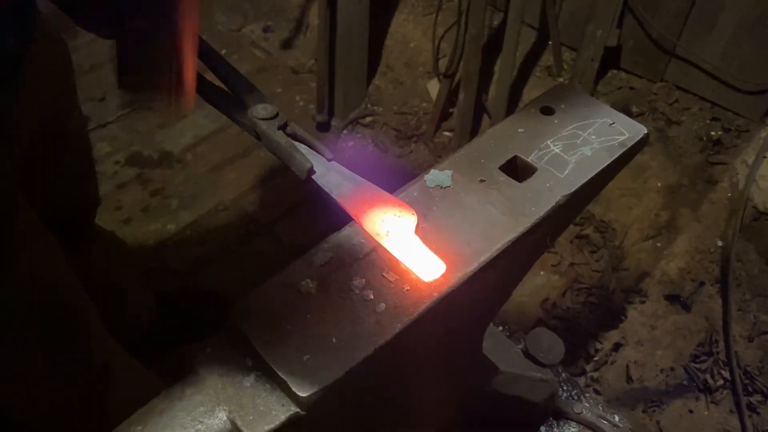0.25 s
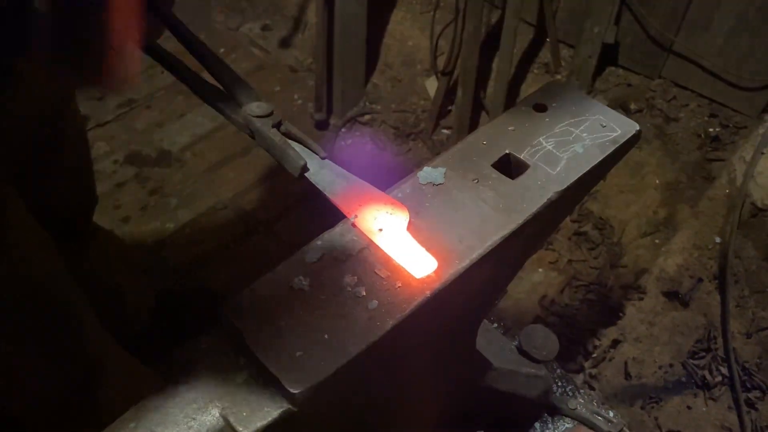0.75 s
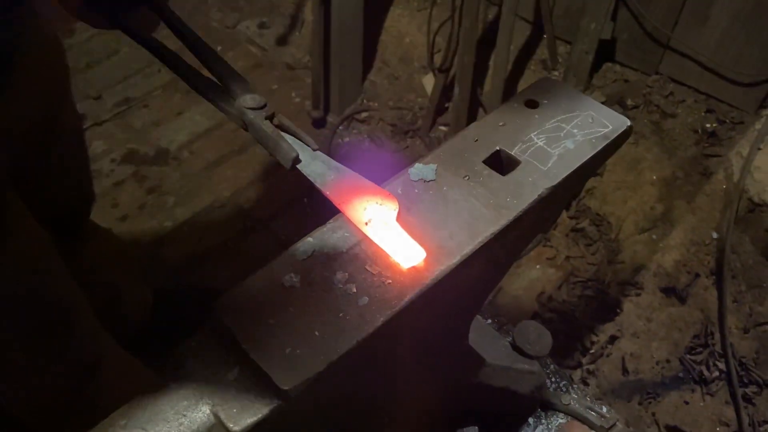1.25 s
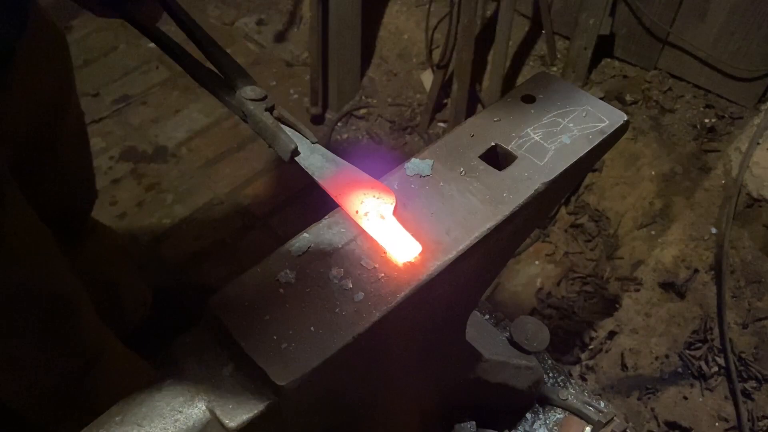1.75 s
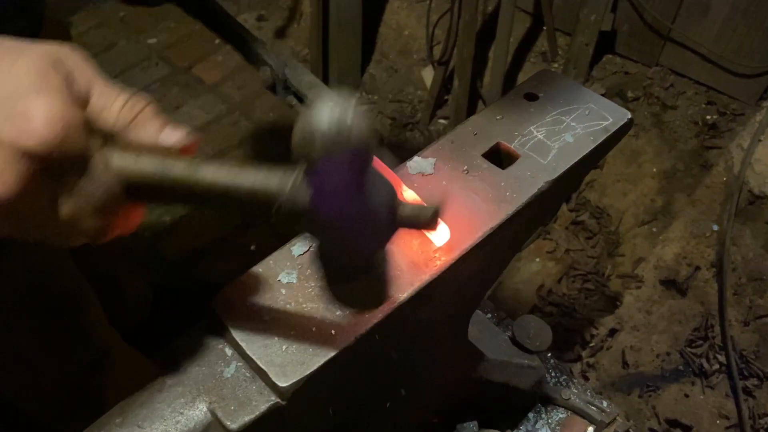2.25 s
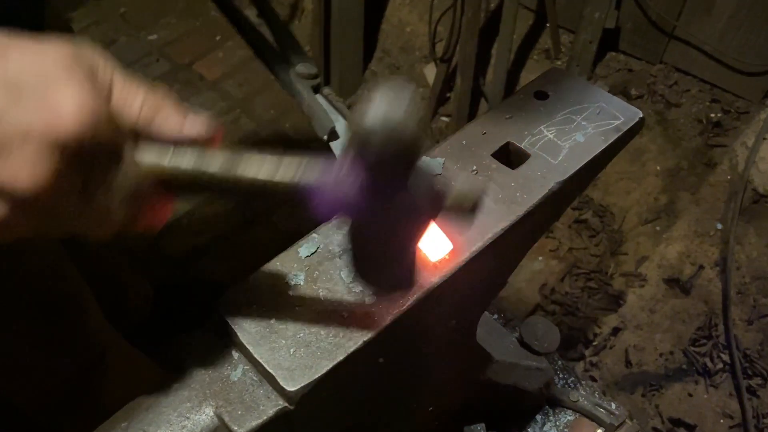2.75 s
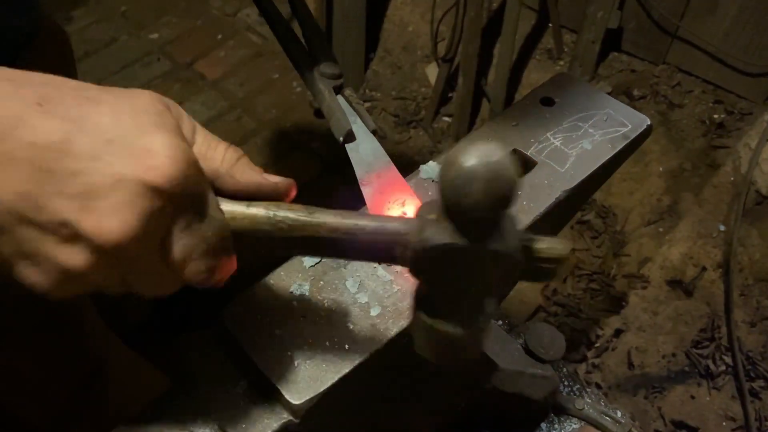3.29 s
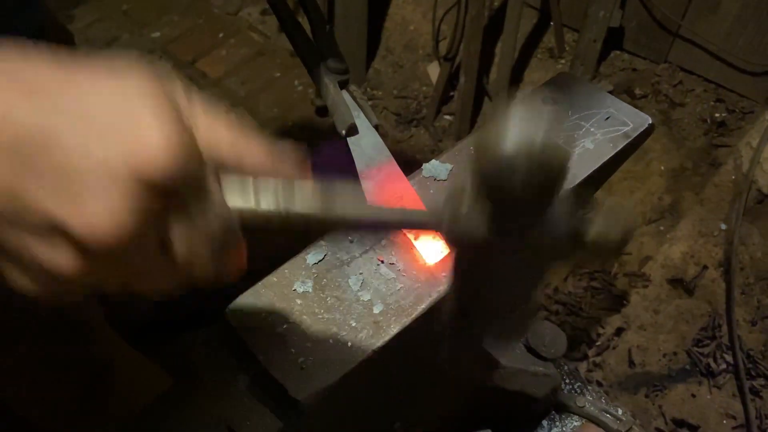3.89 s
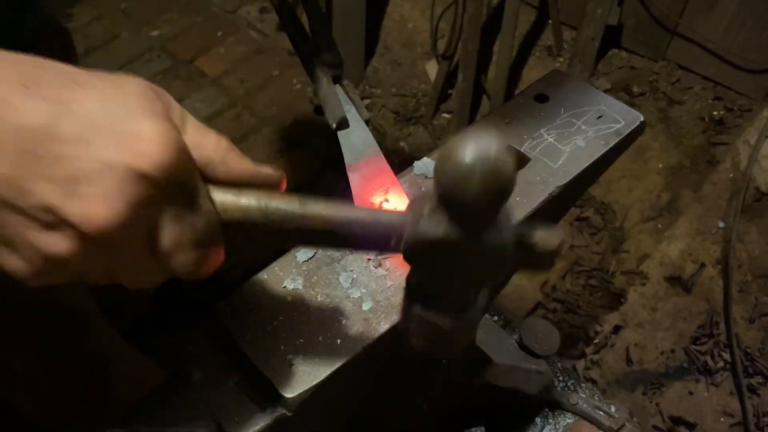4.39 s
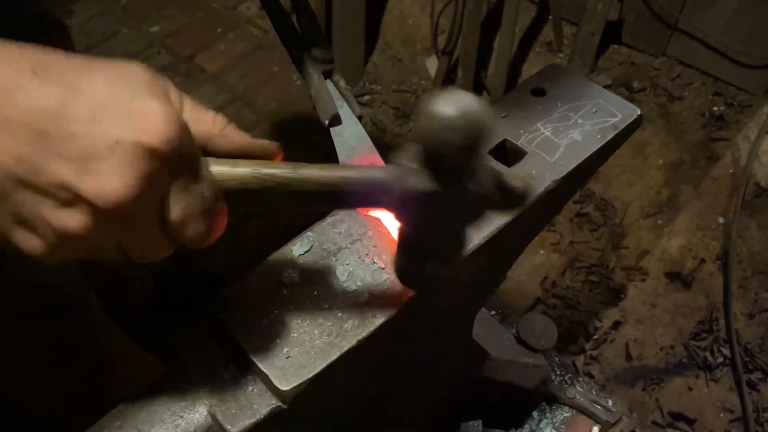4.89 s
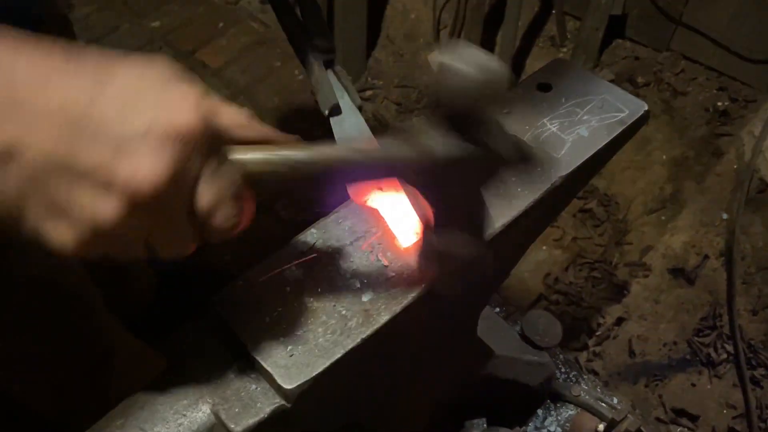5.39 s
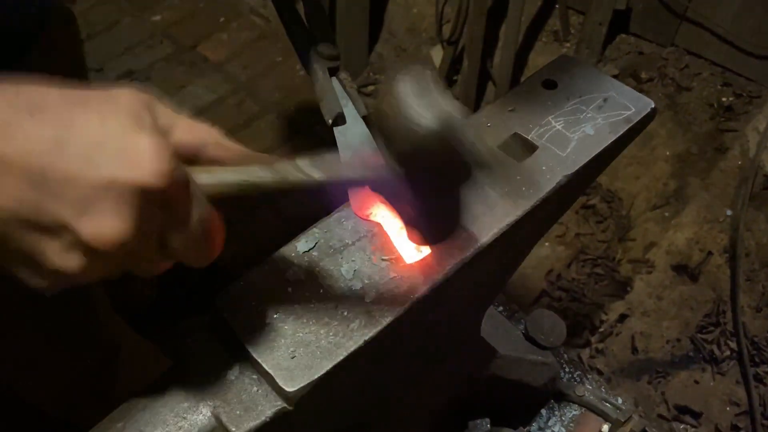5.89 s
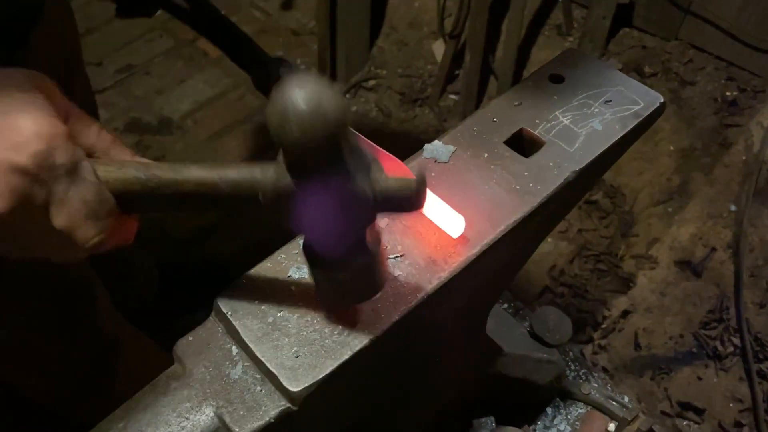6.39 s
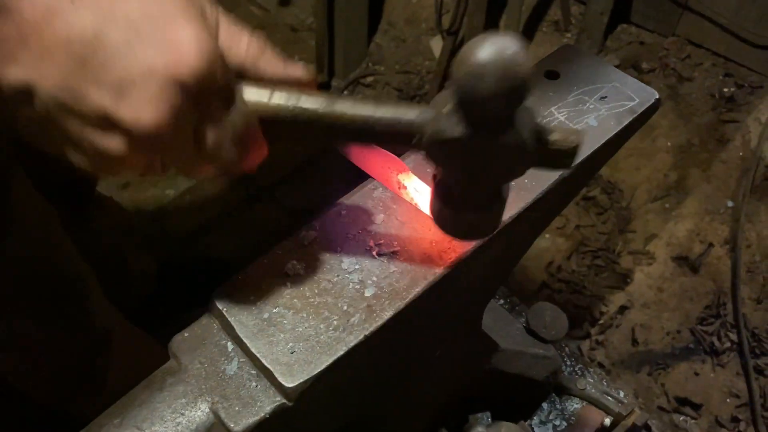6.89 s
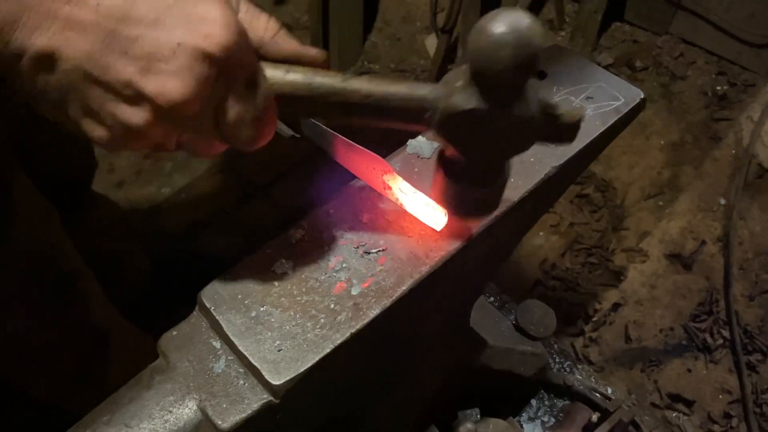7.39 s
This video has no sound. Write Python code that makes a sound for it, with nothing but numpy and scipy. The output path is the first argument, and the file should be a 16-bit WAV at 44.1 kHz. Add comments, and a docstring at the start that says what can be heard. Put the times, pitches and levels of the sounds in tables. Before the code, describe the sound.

Hard metallic hammer blows thud and clank about twice a second on an anvil outdoors, briefly echoing, while insects pulse quietly behind a low rumble.

```python
"""An open-air forge at night: a smith flattens a hot steel bar on an anvil. Heavy blows thud and ring briefly,
as contact pulses and decaying steel modes with echoes of forge and yard. Between them the hammer bounces
lightly on the bare face; bar and tongs rattle back onto the anvil as short bright noise bursts, and the sliding
bar is gritty band noise. Falling tones chirp, noise bands trill and throb as crickets, over a low rumble of
shaped noise with a thin hum."""
import sys
import numpy as np
from scipy import signal
from scipy.fft import rfft, irfft, next_fast_len
from scipy.io import wavfile
from scipy.ndimage import uniform_filter1d

SR = 44100
rng = np.random.default_rng(int(sys.argv[2]) if len(sys.argv) > 2 else 0)


def int16_out(signal):
    """Quantize to a 16-bit WAV file."""
    q = np.round(np.clip(np.atleast_2d(signal).T, -1, 1) * 32767)
    wavfile.write(sys.argv[1], SR, q.astype(np.int16))


N = 337365
TIME = np.arange(N) / SR
SPAN = 2 ** 16   # samples in which one blow dies away

# blows on the hot bar; a dead blow sinks into the steel instead of ringing the anvil: (time [s], force [dB],
# thump against force [dB], deadness [0-1], rattle of bar and tongs before its trim [dB])
HOT_BLOWS = [(-.25, 2, -24, .1, -60), (.278, 0, -17.5, .05, -34.5), (.807, -0.5, -16.5, 0.05, -54),
             (1.352, -0.5, -30, .05, -37.5), (1.884, .5, -33.5, .1, -62), (3.063, 0.5, -30, .7, -62),
             (3.596, -1.5, -27, .05, -36.5), (4.144, 0, -28, .3, -25), (4.688, .5, -35.5, .05, -26.5),
             (5.215, -0.5, -28.5, .05, -55), (5.749, -0.5, -31.5, .1, -50.5), (6.618, -12.5, -35, 1, -70),
             (7.183, 2, -31.5, 0.92, -60)]


def from_db(db):
    """Decibels to gain."""
    return 10 ** (np.asarray(db) / 20)


def rms_one(x):
    """Scale to unit rms."""
    return x / np.sqrt(np.mean(x ** 2) + 1e-30)


def at_hz(points, hz, axis=1):
    """Read one column of a table on a log-frequency axis."""
    points = np.array(points)
    return np.interp(np.log(np.maximum(hz, 1)), np.log(points[:, 0]), points[:, axis])


def at_time(curve, s):
    """Read a curve at time s."""
    return np.interp(s, *np.transpose(curve))


def bins(size):
    """Frequencies of a spectrum of so many samples."""
    return np.fft.rfftfreq(size, 1 / SR)


def add(out, s, sound):
    """Mix a sound in, starting at time s."""
    at = int(round(s * SR))
    first, last = max(at, 0), min(at + sound.shape[-1], N)
    if last > first:
        out[..., first:last] += sound[..., first - at:last - at]


def diffuse(size):
    """Spectrum of white stereo noise that arrives from all sides."""
    # left-right likeness of diffuse sound: (frequency [Hz], correlation [-1 to 1])
    likeness = [(100, .9), (300, .8), (650, .4), (1400, .1), (3000, .3), (6200, .3), (8500, .95),
                (15000, .95)]
    mid, side = rfft(rng.standard_normal((2, size)))
    alike = np.clip(at_hz(likeness, bins(size)), -1, 1)
    opposed = side * [[1], [-1]]
    return np.sqrt((1 + alike) / 2) * mid + np.sqrt((1 - alike) / 2) * opposed


def noise(gain_at):
    """Diffuse noise coloured by a gain that depends on frequency."""
    size = next_fast_len(N, True)
    return irfft(diffuse(size) * gain_at(bins(size)), size)[:, :N]


def band_noise(hz, width):
    """Diffuse noise through a steep resonance, rms 1."""
    return rms_one(noise(lambda f: 1 / (1 + ((f - hz) / width * 2) ** 2) ** 1.3))


def swell(middle, half):
    """A smooth rise and fall."""
    return np.exp(-((TIME - middle) / half) ** 2)


def causal(db):
    """Spectrum of the most compact causal pulse with these levels."""
    cepstrum = irfft(np.log(from_db(db)))
    # folding the cepstrum onto positive times gives minimum phase
    cepstrum[1:SPAN // 2] *= 2
    cepstrum[SPAN // 2 + 1:] = 0
    return np.exp(rfft(cepstrum))


def contacts():
    """Force and deadness shape each contact.

    Yields time [s], then knock, thump, ring, clack, crack, left over right, carry into the yard [dB].
    """
    # the hammer idles on the bare face while the bar is turned: (time [s], force [dB])
    taps = [(2.222, 0), (2.333, -2), (2.418, -7.5), (6.178, -1.3), (6.307, -2.5)]
    # parts of a lively blow at zero force, in dB
    knock_db, ring_db, clack_db, crack_db, carry_db, pan_db = -9.5, -13.5, -24, -23, 4.5, 1.7
    # what a wholly dead blow gains and loses, in dB
    dead_knock_gain, dead_ring_loss, dead_crack_loss, dead_carry_loss = 7, 11, 2, 7.5
    for s, force, thump, dead, _ in HOT_BLOWS:
        knock = force + knock_db + dead_knock_gain * dead
        ringing = force + ring_db - dead_ring_loss * dead ** 2
        crack = force + crack_db - dead_crack_loss * dead
        carry = carry_db - dead_carry_loss * dead
        yield s, knock, force + thump, ringing, force + clack_db, crack, pan_db, carry

    # parts of a tap at zero force, in dB
    knock_db, thump_db, ring_db, clack_db, crack_db, carry_db, pan_db = -10.5, -44.5, -14.5, -24.5, -36, -6, 2
    crack_slope = 3.3   # dB of crack per dB of force: softer taps are duller
    for s, force in taps:
        crack = crack_slope * force + crack_db
        yield (s, force + knock_db, force + thump_db, force + ring_db,
               force + clack_db, crack, pan_db, carry_db)


def crunch(t60=0.02, above_hz=2800):
    """Scale crushed under the face smears the treble of the contact into a tiny burst."""
    fade = from_db(-60 * np.arange(SPAN // 64) / SR / t60)
    burst = rfft(irfft(diffuse(SPAN // 64)) * fade, SPAN) / np.sqrt(np.sum(fade ** 2))
    smooth = 1 / (1 + (bins(SPAN) / above_hz) ** 8)
    return np.sqrt(smooth) + np.sqrt(1 - smooth) * burst


def ring(modes, spread_db, detune):
    """Spectrum of struck modes; each blow lands elsewhere and loads them differently."""
    t, out = np.arange(SPAN // 4) / SR, 0
    draws = rng.standard_normal((len(modes), 2))
    for (hz, db, t60), (strength, shift) in zip(modes, draws):
        fade = from_db(db + spread_db * strength - 60 * t / t60)
        out = out + fade * np.sin(2 * np.pi * hz * (1 + detune * shift) * t)
    return rfft(out, SPAN)


def reflections(table, build_s, size):
    """Spectrum of a cloud of echoes that builds up, then dies at its own rate in each band."""
    t, hz, white, out = np.arange(size) / SR, bins(size), diffuse(size), 0
    centres = np.log([row[0] for row in table])
    for own, (_, _, t60) in zip(np.eye(len(table)), table):
        # each band crossfades into its neighbours
        share = np.interp(np.log(np.maximum(hz, 1)), centres, own)
        fade = (1 - np.exp(-(t / build_s) ** 2)) * from_db(-60 * t / t60)
        out = out + irfft(white * share) * fade / np.sqrt(np.sum(fade ** 2))
    return rfft(out, SPAN) * from_db(at_hz(table, bins(SPAN)))


def hammer(far_thump_db=-24):
    """Each blow: a contact pulse and the ring of the steel, thrown back by the forge and the yard."""
    # colour of the contact pulse: (frequency [Hz], level [dB])
    contact_colour = [(25, 27.5), (55, 45), (120, 51.5), (220, 48), (340, 39.5), (600, 27), (900, 28),
                      (1300, 27.5), (2000, 36.5), (2500, 33), (3100, 26.5), (4400, 32), (5800, 28),
                      (11000, 28), (16000, 26)]
    # dips and lifts on the direct path, where a bounce off the anvil face interferes:
    # (frequency [Hz], level [dB])
    face_dips = [(400, -3), (610, -11), (790, 3.5), (1000, -10), (1200, -1)]
    # modes of anvil and hammer head: pitch [Hz]
    anvil_hz = [2243, 2278, 2410, 4488, 4728, 7915, 8296, 9040]
    # the same modes in the same order: (level [dB], t60 [s])
    anvil_decay = [(3.5, 0.057), (-15, .12), (-10, 0.069), (-17, 0.081), (-17.5, 0.068), (-19, .11),
                   (-12.5, 0.034), (-20.5, 0.016)]
    # top modes, which follow the crack: (frequency [Hz], level [dB], t60 [s])
    ping = [(11960, -10, .04), (12900, 0, .018), (15690, -3, .05)]
    # scatter from nearby tools and walls: (frequency [Hz], level against direct sound [dB], t60 [s])
    scatter = [(60, -19.5, 0.18), (257, -12.5, 0.34), (820, -13, 0.17), (2010, -9.5, 0.13),
               (3830, -4.5, 0.15), (7700, -4, 0.13), (15000, -9, 0.075)]
    # reverberation of the yard: (frequency [Hz], level against direct sound before carry [dB], t60 [s])
    yard = [(51, -19, 0.79), (129, -16, 1.2), (342, -28.5, 0.52), (1000, -28.5, 0.63), (2240, -29, 0.82),
            (4500, -22, 0.87), (8000, -25.5, 0.73), (14600, -35.5, 0.43)]
    # deep, slowly building boom: (frequency [Hz], level against direct sound before carry [dB], t60 [s])
    boom = [(32, -20.5, .8), (50.5, -6, 1), (76.6, -19.5, .7), (200, -50, 0.16)]

    out, hz = np.zeros((2, N)), bins(SPAN)
    # lead_s leaves room ahead of each pulse
    lag_cycles, flight_s, lead_s = 1.1, .0013, .03
    # the lows trail the highs by about a cycle, so the thump falls in pitch
    trail = np.exp(-2j * np.pi * lag_cycles * np.log((hz + 10) / SR))
    lead_in = np.exp(-2j * np.pi * hz * lead_s)
    colour, dips = at_hz(contact_colour, hz), at_hz(face_dips, hz)
    anvil = np.c_[anvil_hz, anvil_decay]
    # the contacts take turns with four echo patterns
    yards = [reflections(yard, build_s=0.011, size=SPAN) + reflections(boom, build_s=0.13, size=SPAN)
             for _ in range(4)]
    for k, (s, knock, thump, ring_db, clack, crack, pan, carry) in enumerate(contacts()):
        # (frequency [Hz], level [dB])
        force = [(600, knock), (1300, knock), (2200, ring_db), (3100, clack), (7000, clack), (10000, crack)]
        near_db = at_hz([(180, thump)] + force, hz) + colour + dips
        near = causal(near_db) * trail * crunch()
        # only the deepest part of the thump carries far
        far_db = at_hz([(55, thump), (180, knock + far_thump_db)] + force, hz) + colour
        far = causal(far_db) * trail
        steel = from_db(ring_db) * ring(anvil, spread_db=1.2, detune=.0015)
        steel = steel + from_db(crack) * ring(ping, spread_db=3, detune=.002)
        room = reflections(scatter, build_s=.002, size=SPAN // 4) + from_db(carry) * yards[k % len(yards)]
        blow = irfft((near + steel + (far + steel) * room) * lead_in)
        add(out, s + flight_s - lead_s, from_db([[pan / 2], [-pan / 2]]) * blow)
    return out


def rattles(level_db=-12, t60=0.033):
    """After each blow the bar and tongs settle back onto the anvil and hop once with tiny bright ticks."""
    fall_s, hop_s, hop_loss_db = .06, 0.021, 7.5
    t, level = np.arange(SPAN // 8) / SR, np.zeros(N)
    for s, *_, rattle_db in HOT_BLOWS:
        tick = from_db(rattle_db + level_db - 60 * t / t60)
        add(level, s + fall_s, tick)
        add(level, s + fall_s + hop_s, from_db(-hop_loss_db) * tick)
    return level * band_noise(hz=8000, width=15000)


def chirps(spread_db=1.15):
    """One chirp of the nearest insect on every beat, each a little different: (start [s], level [dB])."""
    # the beat drifts slowly: (time [s], time from chirp to chirp [s])
    chirp_beat = [(0, .275), (1.5, .27), (2.6, .275), (3.4, .284), (4.4, .279), (5, .265), (6, .274),
                  (7.2, .286)]
    # typical loudness: (time [s], level [dB])
    chirp_level = [(0, -59), (1.2, -64.5), (2.5, -66.5), (7.6, -65.5)]
    s = -.112   # first chirp, already under way as the scene opens
    while s < N / SR:
        yield s, at_time(chirp_level, s) + spread_db * rng.standard_normal()
        s += at_time(chirp_beat, s)


def chirper(count=7):
    """A chirp is a run of wing strokes, each a short raspy tone that falls in pitch."""
    pulse_s, start_hz, end_hz, rasp = .0215, 3560, 2750, .2   # rasp: pitch noise before smoothing
    swell_db = 1.5   # from the first stroke of a chirp to the last
    wet_db, t60 = -1, .2   # echo among the trees
    out, stroke = np.zeros(N), np.linspace(0, 1, int(pulse_s * SR))
    for s, db in chirps():
        for k in range(count):
            # the scraper crosses the file unevenly
            uneven = 1 + rasp * uniform_filter1d(rng.standard_normal(len(stroke)), size=70)
            hz = (start_hz + (end_hz - start_hz) * stroke ** 2) * uneven
            tone = np.sin(np.pi * stroke) ** 2 * np.sin(2 * np.pi * np.cumsum(hz) / SR)
            stroke_db = db + swell_db * k / (count - 1) + rng.normal(0, 0.83)
            add(out, s + k * pulse_s, from_db(stroke_db) * tone)
    fade = from_db(-60 * np.arange(SPAN // 4) / SR / t60)
    trees = irfft(diffuse(SPAN // 4)) * fade / np.sqrt(np.sum(fade ** 2))
    return out + from_db(wet_db) * signal.fftconvolve(out[None], trees)[:, :N]


def crickets(trill_hz=5080, trill_width=170):
    """Many far crickets merge into throbbing noise bands; one nearer trills in bouts."""
    # the nearer cricket's bouts: (middle [s], half length [s], level [dB])
    trills = [(0.578, 0.23, -68.5), (2.08, .1, -70), (3.82, 0.057, -72.5), (5.4, .08, -71.5),
              (6.72, 0.064, -68.5)]
    # bands of the far chorus: (centre [Hz], width [Hz])
    chorus = [(2265, 260), (4530, 380), (4850, 300), (5380, 350), (6390, 150)]
    # the same bands in the same order: level [dB]
    chorus_db = [-74.5, -74.5, -82, -92, -87]
    bouts = sum(from_db(db) * swell(s, half) for s, half, db in trills)
    out = bouts * band_noise(trill_hz, trill_width)
    for (hz, width), db in zip(chorus, chorus_db):
        # a 45 Hz throb with wandering phase
        wander = np.cumsum(rng.normal(0, .04, N))
        wings = 1 + .25 * np.sin(2 * np.pi * 45 * TIME + wander)
        out = out + from_db(db) * wings * band_noise(hz, width)
    return out


def night(hum_hz=347, hum_db=-88):
    """Low rumble and faint air as shaped noise, with a thin steady hum."""
    # night air: (frequency [Hz], density [dB per Hz])
    air_density = [(20, -126), (50, -94.5), (80, -86.5), (140, -99), (250, -110), (500, -117), (1200, -125),
                   (2800, -121), (3900, -126), (7000, -127), (9000, -138), (16000, -145)]
    air = noise(lambda hz: from_db(at_hz(air_density, hz))) * np.sqrt(SR / 2)
    return air + from_db(hum_db) * np.sin(2 * np.pi * hum_hz * TIME)


def slides(grit_db=3):
    """The bar rubs unevenly on the anvil as the tongs shift it."""
    # rubs on the face: (middle [s], half length [s], level [dB], centre [Hz], width [Hz])
    rubs = [(5.5, .09, -73, 10700, 3000), (5.5, .08, -78, 14800, 2400), (6.675, .02, -59, 750, 400),
            (6.72, .026, -55, 800, 500)]
    unevenness = rms_one(uniform_filter1d(rng.standard_normal(N), size=300))
    rubbing = sum(from_db(db) * swell(s, half) * band_noise(hz, width) for s, half, db, hz, width in rubs)
    return from_db(grit_db * unevenness) * rubbing


def scene():
    """The anvil close by, insects all around."""
    return hammer() + rattles() + chirper() + crickets() + night() + slides()


def record(dry):
    """The two microphone ports differ in phase and level, peaks are rounded, the top is cut."""
    # left port against right: (frequency [Hz], phase lead [rad], level [dB])
    port_offsets = [(100, .5, 0), (350, .3, 1), (620, .5, -1), (870, .1, 5), (1080, .5, -3),
                    (1750, 1.4, -1), (2300, -.3, -1), (2700, .2, 0), (4650, .3, 0), (7400, -.3, -1),
                    (9100, -3.14, -1), (13400, -9.4, -1), (15000, -12.4, -1), (16500, -12.7, -1)]
    cutoff_hz = 17000   # 60 dB down from here up
    size = next_fast_len(N + SPAN // 8, True)
    lead = at_hz(port_offsets, bins(size))
    tilt_db = at_hz(port_offsets, bins(size), axis=2)
    ports = np.exp(1j * lead * [[1], [0]]) * from_db(tilt_db * [[.5], [-.5]])
    heard = irfft(rfft(dry, size) * ports, size)[:, :N]
    top_cut = signal.cheby2(14, 60, cutoff_hz, fs=SR, output="sos")
    return signal.sosfilt(top_cut, np.tanh(heard))


dry = scene()
out = record(dry)
int16_out(out)
```